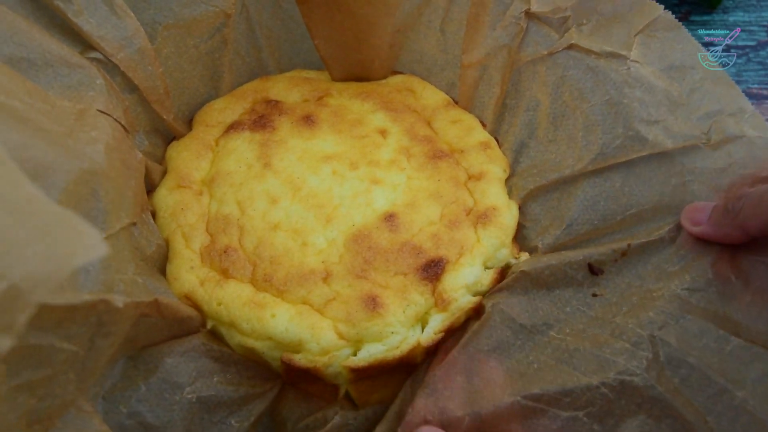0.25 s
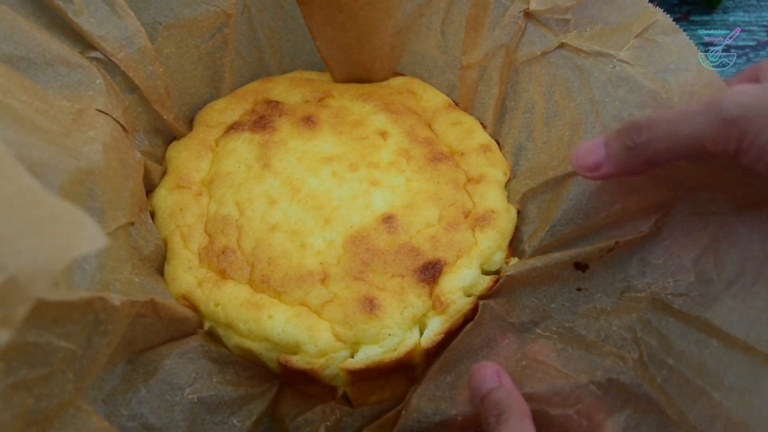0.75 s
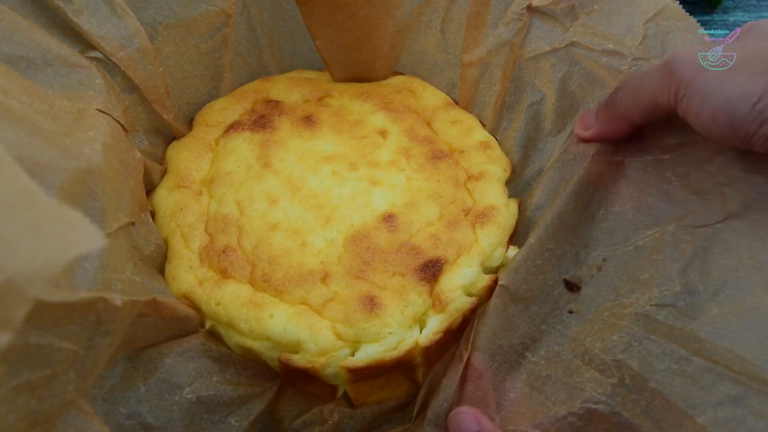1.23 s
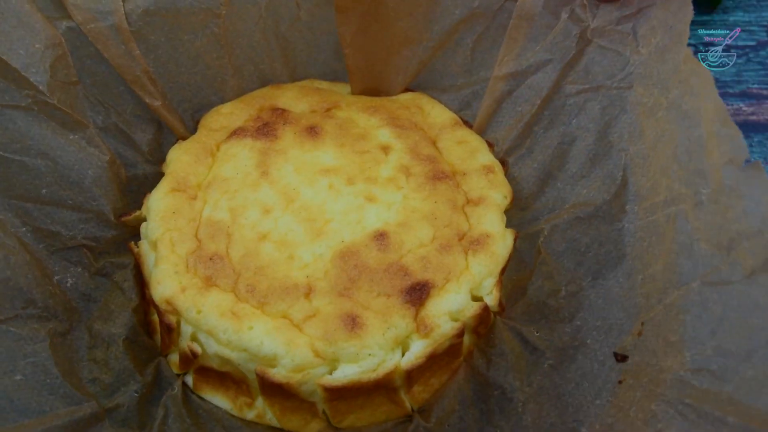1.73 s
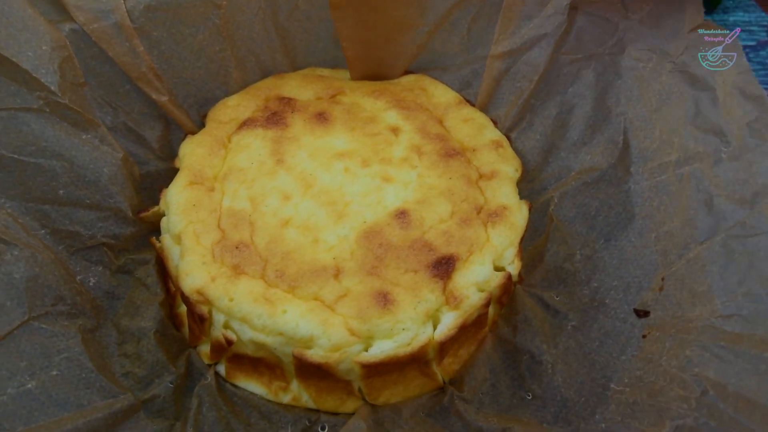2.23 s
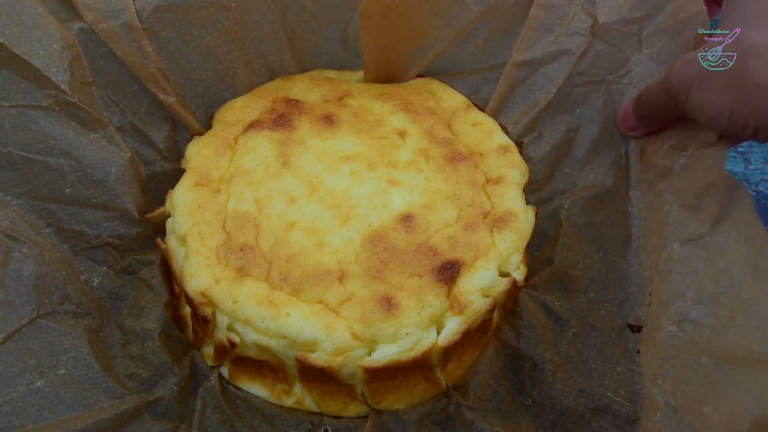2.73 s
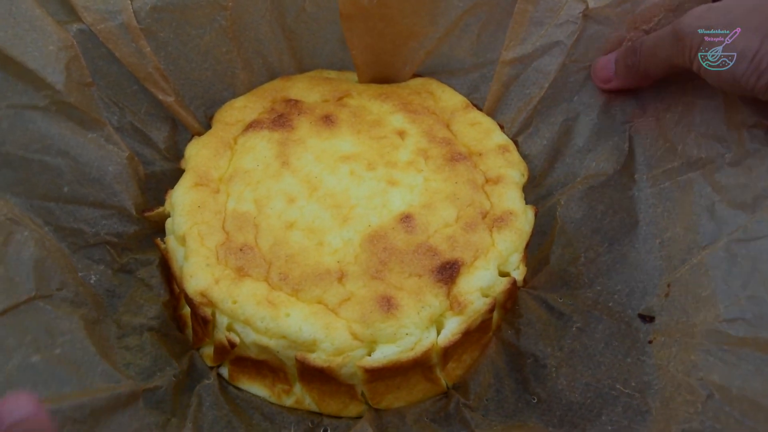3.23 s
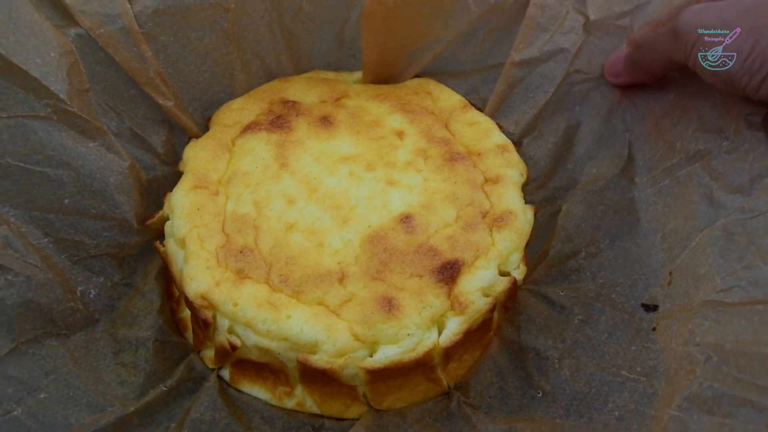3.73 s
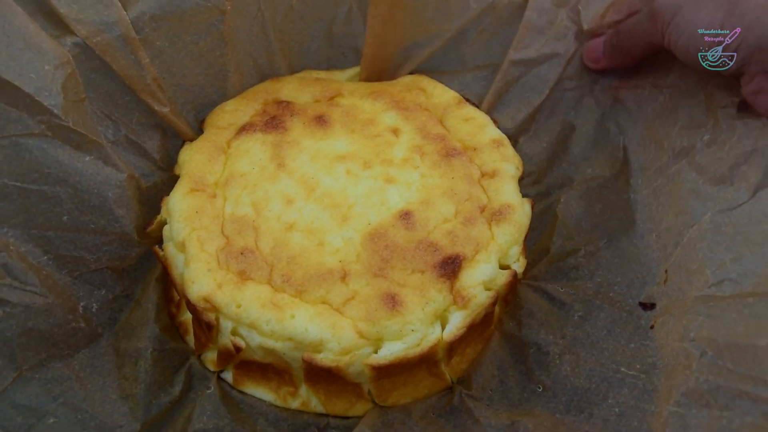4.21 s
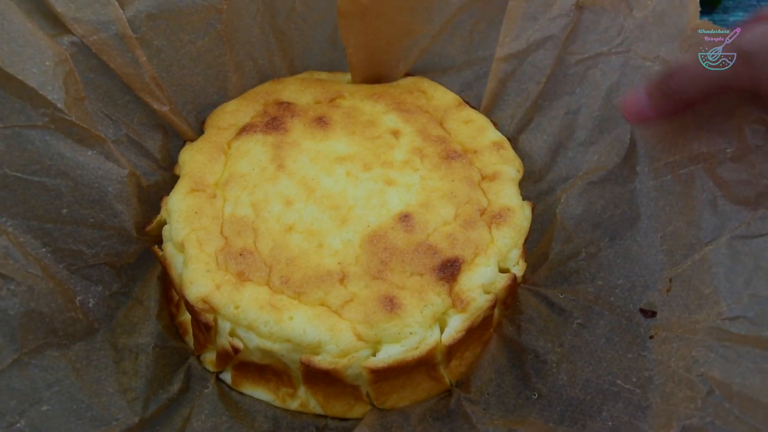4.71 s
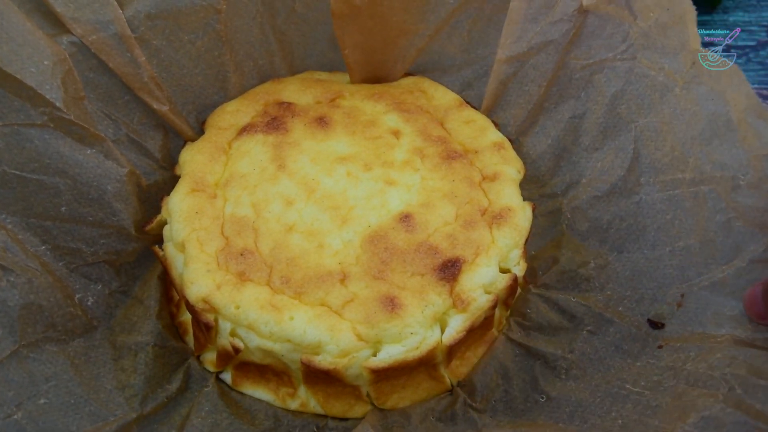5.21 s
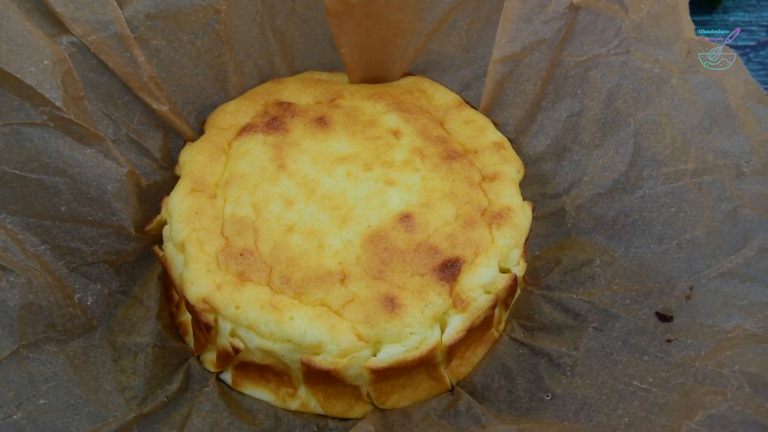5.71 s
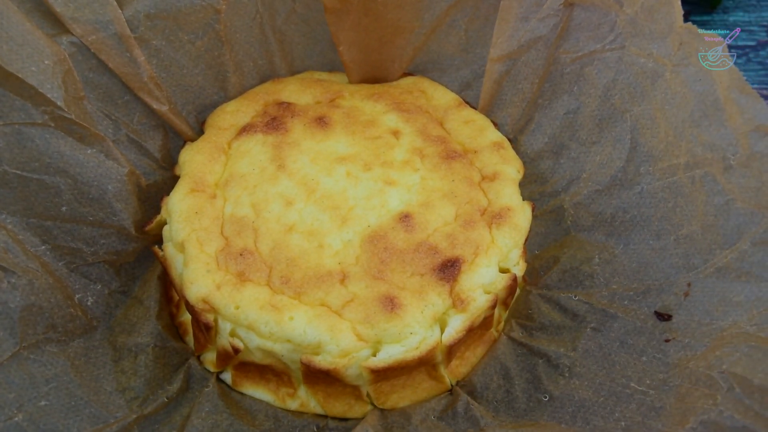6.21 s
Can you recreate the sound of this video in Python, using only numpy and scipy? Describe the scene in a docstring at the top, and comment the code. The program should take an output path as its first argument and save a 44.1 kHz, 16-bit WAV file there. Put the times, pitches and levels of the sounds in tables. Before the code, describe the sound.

Thick parchment crinkles right beside the microphone, dry and bright with a slightly hollow papery body. Single pops stand out over fine crackle and rustling as hands flatten the sheet in uneven pulls. Muffled thuds and soft low flapping accompany the movement. The room is small with a short tail and quiet hiss. Activity pauses late, resumes briefly, then falls away to an isolated snap and faint low bumps.

```python
"""On a kitchen table, hands open out stiff crumpled baking paper around a cake, close to a mono microphone.
Creases snap through as single pops with short noise bursts, and clumps of tiny bursts make the crackle
and the sliding rustle. Moving paper pushes a low noise rumble, and decaying low sines thud faintly.
A small room, made of decaying noise, and a quiet shaped hiss lie behind."""
import sys
import numpy as np
from scipy import signal
from scipy.fft import rfft, irfft
from scipy.io import wavfile

SR = 44100
rng = np.random.default_rng(int(sys.argv[2]) if len(sys.argv) > 2 else 0)


def waveform_to_disk(signal):
    """Save audio, clipped to [-1, 1], as 16-bit WAV at the path in sys.argv[1]."""
    frames = np.transpose(np.atleast_2d(signal))
    scaled = np.clip(frames, -1, 1) * 32767
    samples = np.round(scaled).astype(np.int16)
    wavfile.write(sys.argv[1], SR, samples)


N = 284886


def amp(db):
    """Gain of a level in dB."""
    return 10 ** (np.asarray(db) / 20)


def rms_one(x):
    """Scale a signal to rms 1."""
    return x / np.sqrt(np.mean(x ** 2) + 1e-20)


def at_hz(points, hz):
    """Read the second column of a spectrum table on a log-frequency axis."""
    table_hz, values = np.transpose(points)
    return np.interp(np.log(hz), np.log(table_hz), values)


def drift(rate_hz):
    """Slow random wander of rms 1: noise smoothed by two equal poles, drawn every 40 samples."""
    step = 40
    pole = np.exp(-2 * np.pi * rate_hz * step / SR)
    noise = rng.standard_normal(N // step + 2002)
    slow = signal.lfilter([1], [1, -2 * pole, pole * pole], noise)[2000:]   # skip the settling
    return np.interp(np.arange(N) / step, np.arange(len(slow)), rms_one(slow))


# half-octave bands that carry the paper and the room: edges and centres [Hz]
EDGES = 160 * 2 ** np.arange(0, 6.8, .5)
CENTRES = np.sqrt(EDGES[1:] * EDGES[:-1])


def band(x, k, order=2):
    """Filter a signal to half-octave band number k."""
    sos = signal.butter(order, EDGES[k:k + 2], "band", fs=SR, output="sos")
    return signal.sosfilt(sos, x)


# colour of the room rumble and microphone hiss: (frequency [Hz], relative level [dB])
HISS_COLOUR = [(15, -35), (25, -9), (50, -3), (100, -3.5), (200, -12.5), (400, -15), (1000, -20),
               (3000, -24.5), (9000, -24.5), (15500, -27)]
HISS_DB = -56.5


def hiss():
    """Room rumble and microphone hiss: steady noise shaped by one spectrum."""
    hz = np.maximum(np.fft.rfftfreq(N, 1 / SR), 1)
    spectrum = rfft(rng.standard_normal(N)) * amp(at_hz(HISS_COLOUR, hz))
    return amp(HISS_DB) * rms_one(irfft(spectrum, N))


# how long the room rings: (frequency [Hz], time to fall 60 dB [s])
ROOM_DECAY = [(200, 0.11), (1000, 0.29), (4000, 0.25), (15000, 0.11)]
ROOM_DB = -14   # gain of the unit-energy tail against the direct paper


def room(x):
    """Small-room reverb: a diffuse noise tail that dies band by band."""
    t = np.arange(SR // 2) / SR
    tail = np.zeros(len(t))
    for k, hz in enumerate(CENTRES):
        decay = amp(-60 * t / at_hz(ROOM_DECAY, hz))
        tail += band(rng.standard_normal(len(t)), k) * decay
    tail *= np.clip(t / 0.001, 0, 1)   # fades in over 1 ms
    return signal.fftconvolve(x, tail / np.sqrt(np.sum(tail ** 2)))[:N]


# knocks and presses on the table and tin: (time [s], relative level [dB], pitch [Hz])
TABLE_THUDS = [(0.397, -47, 110), (0.898, -51, 68), (1.319, -32, 204), (1.61, -53, 40.4), (1.899, -44, 195),
               (2.448, -48, 68.3), (2.62, -37, 91), (3.059, -56, 38.7), (3.26, -45, 45.7), (3.338, -50, 64),
               (3.951, -45.5, 179), (5.267, -44, 153), (6.296, -44.5, 55.6), (6.319, -38, 38),
               (6.337, -36, 57), (6.401, -41.5, 65.5), (6.44, -50, 37.7)]


def thuds():
    """A soft push sets a low mode swinging for a few cycles."""
    out, t = np.zeros(N), np.arange(SR // 2) / SR
    for start_s, level_db, hz in TABLE_THUDS:
        cycles = t * hz
        rise = 1 - np.exp(-16 * cycles)
        decay = amp(-60 * cycles / 6.6)   # falls 60 dB in 6.6 cycles
        swing = amp(level_db + 10.5) * np.sin(2 * np.pi * cycles) * rise * decay
        i = round(start_s * SR)
        out[i:i + len(t)] += swing[:N - i]
    return out


# the hands tug at the sheet:
# (time of the strongest moment [s], length [s], relative rustle level [dB], boom against rustle [dB])
HAND_TUGS = [(0.0, 0.095, -34, -4), (0.456, 0.29, -44.5, -4), (0.655, 0.15, -51, -12),
             (0.767, 0.094, -42.5, 2), (0.935, 0.18, -28, -6), (1.073, .1, -45, 8), (1.15, 0.16, -30, -8.5),
             (1.234, 0.095, -28, -5), (1.497, 0.29, -30.5, -8), (1.596, 0.21, -35, -2),
             (1.902, 0.14, -34.5, -7), (2.238, 0.14, -36.5, -9.5), (2.458, 0.11, -34.5, -5),
             (2.725, 0.54, -41.5, -4), (3.038, 0.36, -39, -5.5), (3.29, 0.84, -41, -2.5),
             (3.57, 0.12, -46, -3), (3.82, 0.26, -37.5, -4.5), (3.94, 0.46, -37.5, -5),
             (4.203, .32, -37, -8), (4.505, 0.26, -37.5, -9), (5.09, 0.29, -38, -3.5),
             (5.468, 0.24, -36, -6), (5.58, 0.61, -39.5, -8.5), (5.747, 0.1, -32.5, -15)]
TUG_RISE_SHARE, TUG_SWING_DB = 0.38, 22   # share of a tug spent swelling; how far it swells and fades
# the held sheet creeps between the tugs: (time [s], relative rustle level [dB])
SHEET_CREEP = [(0, -49.5), (.73, -54.5), (1.1, -52.5), (2.2, -44), (3.0, -64), (3.3, -46), (3.7, -78),
               (4.1, -49.5), (4.65, -47.5), (4.76, -64), (4.94, -80), (5.2, -65), (5.78, -38), (5.88, -94),
               (6.46, -63)]
CREEP_BOOM_DB = -3   # against its rustle


def handling():
    """Rustle level and boom in time: tugs swell fast and fade slower, over the creep of the sheet."""
    t = np.arange(0, N + 64, 64) / SR
    peak_s, length_s, level_db, boom_db = np.transpose(HAND_TUGS)[:, :, None]
    before = (peak_s - t) / TUG_RISE_SHARE
    after = (t - peak_s) / (1 - TUG_RISE_SHARE)
    away = np.where(t < peak_s, before, after) / length_s
    tug_power = amp(level_db - TUG_SWING_DB * away) ** 2
    creep_power = amp(np.interp(t, *np.transpose(SHEET_CREEP))) ** 2
    power = tug_power.sum(axis=0) + creep_power
    # whichever moves the sheet most decides its boom
    boom = ((tug_power * boom_db).sum(axis=0) + creep_power * CREEP_BOOM_DB) / power
    return t, 10 * np.log10(power), boom


def flapping():
    """The moving sheet pushes air: a lumpy rumble that follows the handling."""
    s, level_db, boom_db = handling()
    sos = signal.butter(2, [45, 220], "band", fs=SR, output="sos")
    rumble = rms_one(signal.sosfilt(sos, rng.standard_normal(N)))
    follow_db = 0.77 * np.interp(np.arange(N) / SR, s, level_db + boom_db)
    lumps_db = 6.5 * drift(10.5)
    return amp(follow_db - 23.5 + lumps_db) * rumble


# colour of the paper: (frequency [Hz], level per half-octave band [dB])
PAPER_COLOUR = [(200, -27), (400, -12.5), (800, -9), (1600, -10), (2400, -8.5), (3500, -9.5), (6000, -4),
                (9000, 0.5), (12000, 1.5), (16500, -17)]
# how long a shaken sheet rings, before each layer's stretch: (frequency [Hz], time to fall 60 dB [s])
SHEET_DECAY = [(200, 0.036), (800, 0.027), (1600, 0.027), (4000, 0.02), (15000, 0.015)]
# where the deep, boom, plain and sharp registers blend: (frequency [Hz])
REGISTER_HZ = [700, 1200, 1900, 2600, 6500, 10000]
SHARES = np.eye(4)[:, [0, 1, 1, 2, 2, 3]]   # one row per register, one column per blend point


def bursts(at, level_db, deep_db, boom_db, sharp_db, lumpy_db, pop_db, tick_db, rise_s, stretch):
    """Each buckle pops once, then shakes the sheet in a burst of noise that dies faster in the treble."""
    out, white = np.zeros(N), rng.choice([-1, 1], (2, N))
    lumps = lumpy_db * rng.standard_normal((len(at), len(CENTRES)))   # every buckle has its own colour
    direction = rng.choice([-1, 1], len(at))   # inward or outward
    rise = np.exp(-1 / (rise_s * SR))
    for k, hz in enumerate(CENTRES):
        deep, boom, plain, sharp = [np.interp(np.log(hz), np.log(REGISTER_HZ), share) for share in SHARES]
        register_db = deep * deep_db + boom * boom_db + sharp * sharp_db
        strength = amp(level_db + register_db + lumps[:, k] + at_hz(PAPER_COLOUR, hz))

        # noise burst: fast rise, then decay of its power
        kicks = np.full(N, 1e-18)
        np.add.at(kicks, at, strength ** 2)
        fall = amp(-120 / (stretch * at_hz(SHEET_DECAY, hz) * SR))   # -120 as amplitude is -60 dB in power
        ringing = signal.lfilter([1], [1, -fall], kicks)
        power = signal.lfilter([1 - rise], [1, -rise], ringing)
        out += band(np.sqrt(power * SR / hz) * white[k % 2], k)

        # single impulse: panels pop low, edges tick high
        pops = np.zeros(N)
        impulse_gain = amp((deep + boom) * pop_db + (plain + sharp) * tick_db)
        np.add.at(pops, at, impulse_gain * direction * strength)
        order = 1 if hz < REGISTER_HZ[3] else 2   # gentle slopes keep a low pop short
        out += band(pops * SR / hz, k, order=order)
    return out


# depth of the rustle in the deep register, beyond its boom; wide loose folds rumple, the flattened
# sheet is thin: (time [s], level [dB])
FOLD_RUMPLE = [(0, 1.5), (.8, -0.5), (.95, 3.5), (1.4, 1), (2.0, 3.5), (2.6, -2), (3.4, 0), (4.4, 1),
               (5.0, -2), (6.46, -1.5)]


def wrinkles(per_s, clumpy_db, spread_db, gain_db):
    """Small wrinkles give way in clumps, many faint and a few strong; per_s is the median rate."""
    s, rustle_db, boom_db = handling()
    chance = per_s * amp(clumpy_db * drift(30)) / SR
    at = np.flatnonzero(rng.random(N) < chance)
    sizes_db = spread_db * np.minimum(rng.exponential(1, len(at)), 4)
    level_db = np.interp(at / SR, s, rustle_db) + sizes_db + gain_db
    boom_at = np.interp(at / SR, s, boom_db)
    deep_at = boom_at + np.interp(at / SR, *np.transpose(FOLD_RUMPLE))
    return bursts(at, level_db, deep_at, boom_at, sharp_db=-2.8,
                  lumpy_db=6.5, pop_db=-3.0, tick_db=2.0, rise_s=0.00036, stretch=0.95)


def crackle():
    """Dense even grains blend to a sliding rustle; sparse uneven ones crackle on top."""
    rustle = wrinkles(3000, clumpy_db=2.5, spread_db=2.0, gain_db=-19.5)
    crackles = wrinkles(260, clumpy_db=5.0, spread_db=3.0, gain_db=-8)
    return rustle + crackles


# creases snapping through:
# (time [s], relative level [dB], deep register against it [dB], boom register against it [dB])
CREASE_SNAPS = [(0.007, -27.5, -8, 2), (0.01, -19.5, -12, -26), (0.0159, -17, -10, -2),
                (0.043, -27.5, -8, -4), (0.0512, -22, -20, -12), (0.107, -35, -18, -6),
                (0.1395, -38.5, 0, 1), (0.148, -22.5, -13.5, -18), (0.2325, -31, -9.5, -4),
                (0.2466, -31, -23, -16), (0.2896, -21, -6.5, -10.5), (0.297, -30, -9, -15),
                (0.304, -29, -3.5, -13), (0.3717, -29.5, -25, -20), (0.3949, -38.5, 6.5, -13),
                (0.4032, -25.5, -7, -8), (0.4653, -22, -12.5, -9.5), (0.5303, -31.5, -10.5, -8),
                (0.574, -39.5, -4, 2.5), (0.6228, -31.5, -8.5, -3.5), (0.6648, -32, -19, -6),
                (0.6872, -38.5, -19, 2.5), (0.7631, -20.5, -11, -3.5), (0.7981, -27, -35, 1.5),
                (0.8085, -28, -23, 2), (0.8627, -21.5, -16, -6), (0.8808, -28, 2.5, 6),
                (0.9217, -19, -18, -19), (0.9277, -17.5, -7, -24), (0.934, -27, -13, -25),
                (0.9457, -17.5, -2, -26), (0.9549, -18, -11, -17), (0.9836, -25.5, 2, -14),
                (0.9975, -45, 20, 6), (1.0033, -28, -6, -6), (1.0114, -25.5, 0, 0), (1.0233, -26, -2, 6),
                (1.0289, -25, -2, -3), (1.067, -34, -9, 0), (1.0983, -27, 1, -1), (1.1142, -21.5, -8, -4),
                (1.1264, -21, -16, -13), (1.1481, -18.5, -12, -9.5), (1.1544, -19, -0.5, -5),
                (1.1748, -22, -2, -9), (1.182, -22, -16, -4), (1.196, -15.5, -22, -19),
                (1.2222, -25.5, 1.5, -3), (1.2298, -18, -8, -12), (1.2383, -14, -8.5, -18),
                (1.2562, -15.5, -12, -15), (1.269, -24, -5, 0.5), (1.3034, -23, -10, -10),
                (1.3182, -17, -6, -3.5), (1.3746, -31.5, 1, 7.5), (1.389, -17.5, -16, -15),
                (1.4096, -26.5, -26, -1), (1.4346, -16, -27, -11), (1.4586, -24, -14, -23),
                (1.502, -36, -7, -11), (1.5211, -27, -7, 2), (1.54, -23, -23, -2), (1.575, -21, -30, -11),
                (1.5991, -14.5, -7, -2.5), (1.6315, -14.5, -9, -27), (1.6924, -26, -14, -19),
                (1.704, -32, -17, -18), (1.745, -29, -5.5, -12), (1.804, -30.5, -1.5, -21),
                (1.8888, -33.5, 4.5, -13), (1.8959, -28, -8, -13), (1.934, -31.5, 4.5, -15),
                (2.0203, -35, -17, -15), (2.0555, -21.5, -17, -18), (2.119, -37, 1, -2),
                (2.1473, -20.5, -13, -12), (2.1699, -31, 1, -10), (2.1817, -24.5, -19, -27),
                (2.1929, -34, -22, -18), (2.277, -30.5, -10, -9), (2.304, -33, -8, -2),
                (2.3237, -23, -22, -1.5), (2.333, -48, -5, 1), (2.3488, -29, -17, 1),
                (2.357, -20, -20, -3.5), (2.4313, -25, -17, -16), (2.437, -21.5, -12.5, -19),
                (2.452, -23.5, -18, 6), (2.4674, -17.5, -15, 0), (2.4784, -20.5, -29, -1.5),
                (2.5896, -28.5, -6, -8), (2.606, -24, -15, -1.5), (2.6328, -14.5, -13.5, 0),
                (2.6786, -19, -18, -9), (2.6905, -21.5, -13, 1), (2.7153, -24, -12, 0),
                (2.7263, -23, -18, 0), (2.7431, -16.5, -34, -2.5), (2.7659, -24, -3, -17),
                (2.776, -25.5, -9, -8), (2.8437, -21.5, -39, -13), (2.909, -25, -27, -6.5),
                (2.917, -31, -27, -5), (2.9719, -25, -25, -7.5), (3.059, -25.5, -5.5, -16),
                (3.1162, -26, -10, 2), (3.1478, -20, -15.5, -4), (3.201, -31, -6, 1.5),
                (3.2577, -24, -3.5, 0), (3.263, -18.5, -16, -5.5), (3.2957, -13, -10, -12.5),
                (3.304, -27, -2, 0), (3.311, -24.5, -14, -14), (3.3412, -17.5, -2.5, -15),
                (3.3967, -17, -19, -14), (3.421, -28.5, -16, 2.5), (3.436, -27, -9, -10),
                (3.4755, -31, -12, -6), (3.5314, -25.5, -20, -1.5), (3.5426, -20.5, -32, -12),
                (3.557, -21.5, -20, -12), (3.6008, -23, -23, -20), (3.6347, -33, -30, -2.5),
                (3.7486, -28.5, -19, -9.5), (3.7938, -35.5, -6, 8.5), (3.849, -32, 4.5, -8),
                (3.8779, -27, -11, -18), (3.9152, -19, -11, -20), (3.9527, -17, -28, -4),
                (4.0496, -29, -27, -1), (4.095, -31, -18, -16), (4.1054, -20, -11, -25),
                (4.1123, -30, 4, -6), (4.1237, -18.5, -16, -7), (4.157, -23, -15, -9),
                (4.1862, -18.5, -27, -12), (4.2134, -22, -27, -11), (4.2178, -20, -22, -7),
                (4.2247, -15.5, -23, -10), (4.244, -30, -19, -16), (4.257, -24, -14, -18),
                (4.2645, -23, -18, -11), (4.2685, -28, 7.5, 7), (4.3068, -25, -14, 5.5),
                (4.404, -35, -23, -10), (4.425, -24, -21, -22), (4.4357, -32, -9, 5),
                (4.4558, -20, -30, -13), (4.503, -20, -25, -16), (4.518, -18.5, -8, -19),
                (4.522, -26.5, -11, -7), (4.547, -21.5, -19, -21), (4.5607, -21.5, -13.5, -12),
                (4.6272, -22.5, -20, -5.5), (4.6894, -41.5, 8, 1), (4.956, -40, -4, 0),
                (4.9707, -20.5, -15, -7), (4.998, -36, -9, -5), (5.0161, -30.5, -11, -18),
                (5.0238, -32.5, -8, 0), (5.0319, -17.5, -17, -10), (5.0608, -23, -13, -15),
                (5.0655, -16.5, -29, -3), (5.0847, -16.5, -24, -5.5), (5.098, -15, -14, -7),
                (5.1233, -25, -16, -9), (5.1281, -22, -18, -7), (5.153, -28.5, -18, 1),
                (5.1853, -28.5, -21, 1), (5.2076, -26.5, -13, -2), (5.218, -24.5, -15, -5),
                (5.2271, -27.5, -13, -21), (5.2739, -16.5, -11, -11), (5.281, -26.5, -3, -8),
                (5.2905, -27.5, 0, 8.5), (5.3326, -17, -17, -11.5), (5.4163, -21.5, -28, 1),
                (5.4267, -15, -24, -7), (5.4447, -22, -13, -1.5), (5.467, -29, -20, 0),
                (5.5237, -15, -25, -8), (5.5558, -25, -11, -7), (5.5922, -23.5, -33, -7),
                (5.6238, -29.5, -8, -2), (5.655, -35, -20, 6.5), (5.6905, -24, -22, -8),
                (5.781, -29, -28, -6), (5.8, -20, -10, -7.5), (5.8131, -15, -27, -12),
                (5.927, -49, -10, -5), (6.1989, -14.5, -24.5, -9), (6.3231, -34, -8.5, -7.5),
                (6.39, -50, -15, -4)]


def snaps():
    """Stiff creases buckle one by one, each a clear pop with a short burst of shaken paper."""
    s, level_db, deep_db, boom_db = np.transpose(CREASE_SNAPS)
    return bursts((s * SR).astype(int), level_db, deep_db, boom_db, sharp_db=-3,
                  lumpy_db=2.5, pop_db=-0.5, tick_db=2.5, rise_s=0.000067, stretch=0.68)


# air in the paper bowl: (frequency [Hz], width [Hz], level against the direct sound [dB])
BOWL_AIR = [(740, 430, -4.5), (1583, 300, 5.5), (3830, 1260, -3.5), (8100, 66, -1.5)]


def hollow(x):
    """The bowl of paper adds its air resonances to the direct sound."""
    out = x.copy()
    for hz, width_hz, level_db in BOWL_AIR:
        r = np.exp(-np.pi * width_hz / SR)
        zeros = [(1 - r * r) / 2, 0, (r * r - 1) / 2]
        poles = [1, -2 * r * np.cos(2 * np.pi * hz / SR), r * r]
        out += amp(level_db) * signal.lfilter(zeros, poles, x)
    return out


def scene():
    """Paper, its room, rumble, thuds and hiss reach one microphone that feeds both channels."""
    low_cut = signal.butter(4, 210, "high", fs=SR, output="sos")   # the thin sheet radiates no bass
    paper = signal.sosfilt(low_cut, hollow(snaps() + crackle()))
    heard = paper + amp(ROOM_DB) * room(paper) + flapping() + thuds() + hiss()
    return np.array([heard, heard])


def record(dry):
    """Soft saturation rounds the peaks, then a steep low-pass removes the top."""
    rounded = 0.35 * np.tanh(dry / 0.45)
    top_cut = signal.cheby2(16, 55, 16000, fs=SR, output="sos")   # 55 dB down from 16 kHz up
    return signal.sosfilt(top_cut, rounded)


dry = scene()
out = record(dry)
waveform_to_disk(out)
```